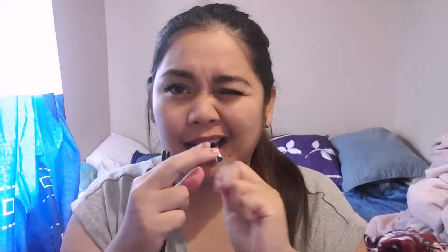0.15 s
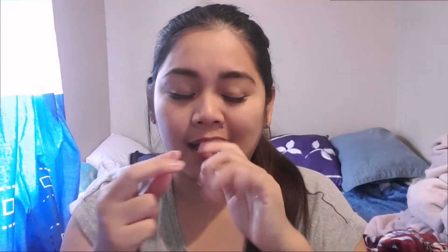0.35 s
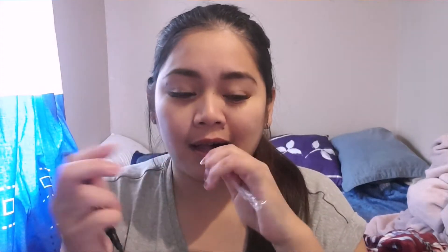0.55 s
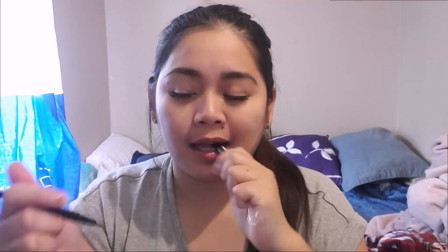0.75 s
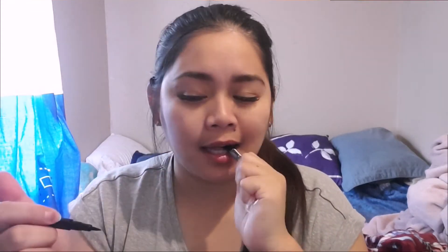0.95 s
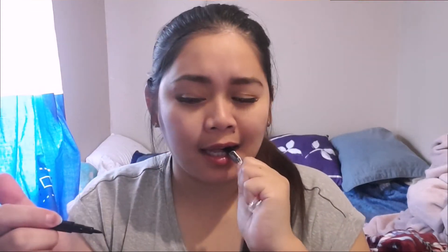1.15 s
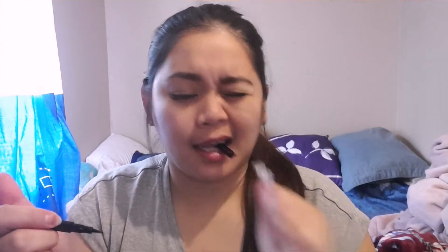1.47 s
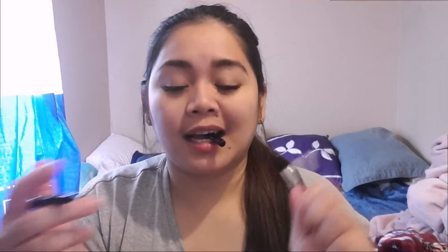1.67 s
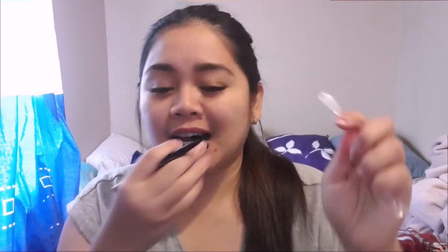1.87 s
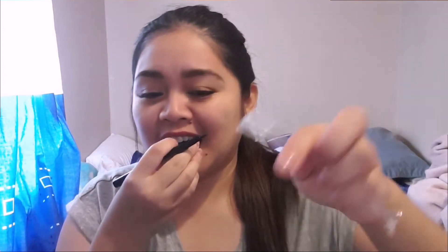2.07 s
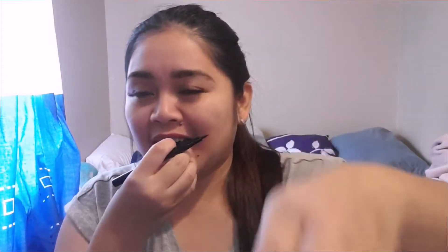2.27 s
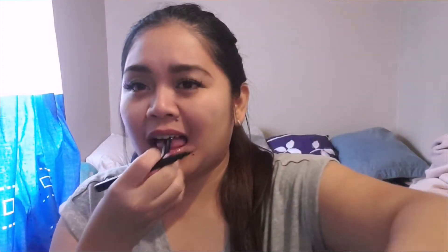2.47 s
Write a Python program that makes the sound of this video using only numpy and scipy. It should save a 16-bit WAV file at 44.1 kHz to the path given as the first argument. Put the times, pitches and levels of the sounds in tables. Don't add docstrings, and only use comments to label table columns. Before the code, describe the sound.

Thin plastic on a pen cap crackles in quick bursts, pauses, crackles again, then the cap comes off with one loud hollow pop; small ticks follow, close up in a small bedroom with a low throbbing hum.

```python
import sys
import numpy as np
from scipy import signal
from scipy.io import wavfile
from scipy.ndimage import uniform_filter1d

SR = 44100
rng = np.random.default_rng(int(sys.argv[2]) if len(sys.argv) > 2 else 0)


def digitize_waveform(pressure):
    field = np.atleast_2d(pressure).T
    bounded = np.clip(field, -1, 1)
    quanta = np.round(bounded * 32767).astype(np.int16)
    wavfile.write(sys.argv[1], SR, quanta)


def how_loud(loudness_db):
    steps = np.asarray(loudness_db, float) / 20
    return 10 ** steps


N = 114660


def rms_one(x):
    return x / np.sqrt(np.mean(x ** 2) + 1e-20)


def peak_one(x):
    return x / np.abs(x).max()


def in_time(rows):
    return np.interp(np.arange(N) / SR, *np.transpose(rows))


def at_hz(points, hz):
    points_hz, values = np.transpose(points)
    return np.interp(np.log(hz), np.log(points_hz), values)


def drift(rate_hz):
    r = np.exp(-2 * np.pi * rate_hz / SR)
    return rms_one(signal.lfilter([1], [1, -2 * r, r * r], rng.standard_normal(N + SR))[SR:])


def resonate(x, hz, width_hz):
    r = np.exp(-np.pi * width_hz / SR)
    poles = [1, -2 * r * np.cos(2 * np.pi * hz / SR), r * r]
    return signal.lfilter([(1 - r * r) / 2, 0, (r * r - 1) / 2], poles, x)


def high_pass(x, hz):
    return signal.sosfilt(signal.butter(4, hz, "high", fs=SR, output="sos"), x)


def colour(x, spectrum):
    edges_hz = 400 * 2 ** np.arange(0, 5.5, 1 / 3)
    out = 0
    for k, (low, high) in enumerate(zip(edges_hz, edges_hz[1:])):
        band = signal.sosfilt(signal.butter(1, [low, high], "band", fs=SR, output="sos"), x)
        out = out + (-1) ** k * how_loud(at_hz(spectrum, np.sqrt(low * high))) * band
    return out


# (frequency [Hz], share [0..1])
LIKENESS = [(60, 0.97), (200, 0.89), (300, 0.8), (640, 0.036), (3000, 0.029)]


def pair(hz):
    mid, side = rng.standard_normal((2, N + SR))
    alike = np.clip(at_hz(LIKENESS, hz), 0, 1)
    return np.sqrt((1 + alike) / 2) * mid + np.sqrt((1 - alike) / 2) * side * [[1], [-1]]


LEAD_S, CREAK_DB, TEAR_DB = .004, -21, 3
SNAP_RISE_S, SNAP_HOLD_S, SNAP_FALL_S = .0005, .001, .0013
SKIRT_S, SKIRT_DB = .005, -13
BRIGHT_ALIKE = .25


def burst(channels=1, stretch=1):
    t = np.arange(1800) / SR - LEAD_S
    after = np.maximum(t, 0) / stretch
    own = rng.standard_normal((channels, len(t)))
    noise = BRIGHT_ALIKE * own[0] + (1 - BRIGHT_ALIKE) * own
    uneven = how_loud(TEAR_DB * (stretch > 1) * np.repeat(rng.standard_normal(60), 30))
    creak = how_loud(CREAK_DB) * np.clip(1 + t / LEAD_S, 0, 1) * (t < SNAP_RISE_S)
    fall = np.exp(-np.maximum(after - SNAP_HOLD_S, 0) / SNAP_FALL_S)
    skirt = how_loud(SKIRT_DB) * np.exp(-after / SKIRT_S)
    tear = (1 - np.exp(-after / SNAP_RISE_S)) * (fall + skirt)
    return noise * (creak + uneven * tear)


RING_WIDTH_HZ, RING_DB, RING_OWN = 750, -2, .7
BROAD_LOW_HZ, BROAD_DB, PULL_BROAD_DB = 3000, 1.5, -5
CRACK_HZ, CRACK_WIDTH_HZ, BRIGHT_LOW_HZ, BRIGHT_DB = 13500, 5000, 9500, 7
BRIGHT_LEFT_DB = -5
# (time [s], peak [dB], ring [Hz], bright part re peak [dB])
TWISTS = [(0.1174, -25, 3980, -9.5), (0.2079, -22, 4740, -6), (0.212, -22, 4200, -10),
          (0.2788, -29.5, 7500, -1), (0.3022, -22.5, 5600, -23), (0.3068, -20.5, 3980, -10),
          (0.32, -36, 4600, 1), (0.328, -48, 4460, -6), (0.36, -50, 4730, 21.5), (0.388, -24.5, 6700, -17),
          (0.3983, -28.5, 3800, -30), (0.4243, -27.5, 5040, 0.5), (0.4376, -34, 4610, 6),
          (0.4476, -36.5, 2770, 7), (0.4641, -30.5, 5960, 2.5), (0.723, -37, 4600, -3),
          (0.7371, -30.5, 3540, -7), (0.7879, -17.5, 3050, -8.5), (0.807, -37, 3300, -2),
          (0.841, -25, 3070, -1.5), (0.843, -25.5, 3250, -6), (0.8682, -34, 3620, 6),
          (0.8788, -23, 6300, -12), (0.9146, -17, 5400, -4), (0.99, -37, 4230, -19),
          (1.0175, -33, 5540, -13), (1.0475, -44, 3970, -3)]
# (time [s], peak [dB], ring [Hz], bright part re peak [dB], length re a snap [x])
SCRAPES = [(0.232, -33, 4040, 3, 1.8), (0.253, -27.5, 6160, -17, 3), (0.2683, -28, 5570, -7, 2.8),
           (0.29, -29, 4400, -7, 3.6), (0.3104, -25.5, 4900, -20, 3), (0.375, -47, 6500, 4, 2.5),
           (0.401, -33, 6700, -24, 3.2), (0.4083, -35, 6500, -10, 1.6), (0.4586, -44, 6000, 5, 1.7),
           (0.4675, -41, 6000, 8, 1.2), (0.859, -29, 4500, 0, 2.2), (0.7825, -30, 2920, -14, 3.9),
           (0.5322, -26, 7000, 2, 2.2), (0.7992, -33.5, 3270, 2, 2.5), (0.8289, -23, 4830, -10, 2),
           (1.378, -42, 7000, 3, 3.4), (1.503, -15.5, 5900, -21, 2.1), (1.51, -21, 5000, -6, 2.6),
           (1.519, -31, 6300, -25, 1.3), (1.749, -34.5, 5560, -12, 1.5), (1.825, -50, 6000, 0, 1.6)]
# (time [s], peak [dB], ring [Hz], bright part re peak [dB])
PULLS = [(1.206, -58, 1610, 6), (1.343, -44, 4260, 4), (1.3608, -23.5, 7200, 5.5), (1.3602, -29, 6770, 5.5),
         (1.4042, -32.5, 7500, 3), (1.485, -2, 5540, -14), (1.4888, -16.5, 5700, -25),
         (1.493, -16, 5570, -30), (1.5008, -9.5, 5900, -4), (1.7376, -38.5, 6160, 4),
         (1.7456, -31, 5200, -12), (1.804, -26, 5530, 10.5), (1.851, -49, 6000, 5),
         (1.8547, -29.5, 6200, -1), (1.8852, -39.5, 6940, -1), (1.911, -46, 3680, 2),
         (1.95, -43.5, 4370, 6), (1.9884, -34.5, 4360, -2), (2.0088, -25.5, 5560, -8),
         (2.0235, -48, 5500, -2), (2.079, -62, 1590, 16), (2.239, -58, 1750, 18.5), (2.2593, -41, 4360, -4)]


def snaps():
    rings, cracks = np.zeros((2, 2, N))
    rows = [(*r, 1, 0) for r in TWISTS]
    rows += [(*r, 0) for r in SCRAPES]
    rows += [(*r, 1, PULL_BROAD_DB) for r in PULLS]
    for s, db, hz, bright_db, stretch, thin_db in rows:
        width_hz = RING_WIDTH_HZ * (hz / 4000) ** 2.6
        strike = burst(1, stretch) + RING_OWN * burst(2, stretch)
        ring = resonate(resonate(strike, hz, width_hz), hz, 2 * width_hz)
        broad = how_loud(BROAD_DB + thin_db) * peak_one(high_pass(burst(2, stretch), BROAD_LOW_HZ))
        crack = resonate(burst(2, stretch), CRACK_HZ, CRACK_WIDTH_HZ)
        bright = how_loud(BRIGHT_DB + bright_db) * peak_one(high_pass(crack, BRIGHT_LOW_HZ))
        start = int((s - LEAD_S) * SR)
        at = slice(start, start + ring.shape[1])
        rings[:, at] += how_loud(db + RING_DB) * peak_one(ring)
        cracks[:, at] += how_loud(db) * (broad + bright * how_loud([[BRIGHT_LEFT_DB], [0]]))
    return rings, cracks


KNOCK_DB = 3
# (time [s], peak [dB])
KNOCKS = [(0.1152, -46.5), (0.2126, -38), (0.2651, -40.5), (0.3057, -41), (0.388, -38), (0.3988, -45),
          (0.788, -34), (1.485, -37.5), (1.4999, -20.5), (1.522, -44), (1.536, -52)]
# (frequency [Hz], width [Hz], level [dB])
CAP = [(480, 650, -14), (1100, 330, -1), (1630, 380, -7.5), (1980, 540, 4)]


def knocks():
    out = np.zeros(N)
    for s, db in KNOCKS:
        modes = [how_loud(g) * resonate(resonate(burst()[0], hz, w), hz, 3 * w) for hz, w, g in CAP]
        x = peak_one(sum(modes))
        out[int((s - LEAD_S) * SR):][:len(x)] += how_loud(db + KNOCK_DB) * x
    return out


GRAINS_PER_S, GRAIN_S, GRAIN_SPREAD_DB, RUSTLE_DB = 500, .0025, 3, -1.5
# (time [s], level [dB])
HANDLING = [(0.0, -74), (0.2, -54), (0.35, -48), (0.41, -46), (0.51, -53), (0.55, -53), (0.76, -69.5),
            (0.89, -49), (1.06, -61.5), (1.16, -68), (1.4, -63.5), (1.55, -60.5), (1.93, -56.5),
            (2.04, -59), (2.21, -66.5), (2.6, -62.5)]
# (frequency [Hz], density [dB per Hz])
FILM = [(710, -14), (1200, 4.5), (2450, 8.5), (3830, 6.5), (4310, -9), (7170, 11), (9110, 4.5), (14200, 13),
        (16000, -79)]


def rustle():
    hits = rng.random(N) < GRAINS_PER_S / SR
    sizes = how_loud(GRAIN_SPREAD_DB * np.minimum(rng.exponential(1, N), 4)) * hits
    swell = signal.lfilter([1], [1, -np.exp(-1 / (GRAIN_S * SR))], sizes + 1e-18)
    film = rms_one(colour(swell * pair(1000)[:, SR:], FILM))
    return how_loud(in_time(HANDLING) + RUSTLE_DB) * film * how_loud([[BRIGHT_LEFT_DB / 2], [0]])


ROOM_T60_S, ROOM_GAP_S, WALL_CUT_HZ = .19, .018, 7500
TREBLE_T60_S, TREBLE_TAIL_DB = .12, 1.5


def room(x):
    t = np.arange(SR // 2) / SR
    noise = rng.standard_normal((2, len(t)))
    low = signal.sosfilt(signal.butter(2, WALL_CUT_HZ, fs=SR, output="sos"), noise)
    low_tail = low * how_loud(-60 * t / ROOM_T60_S)
    treble_tail = (noise - low) * how_loud(TREBLE_TAIL_DB - 60 * t / TREBLE_T60_S)
    tail = (low_tail + treble_tail) * np.clip(t / ROOM_GAP_S - .5, 0, 1)
    return signal.fftconvolve(x[None], tail / np.sqrt((tail ** 2).sum() / 2), axes=1)[:, :N]


HUM_LEFT_DB = -2
# (frequency [Hz], crest time [s])
MOTOR = [(100.1, .1), (147.45, .067), (152.88, .067), (183.99, .165), (189.42, .165), (194.81, .165),
         (200.24, .165), (242.2, .05), (247.6, .05)]
MOTOR_DB = [-58.5, -46.5, -51, -52, -44.5, -42, -75, -68.5, -58]
# (time [s], level [dB])
LOAD = [(0.0, -0.1), (0.3, -0.6), (0.6, 1.2), (0.9, 0), (1.2, -1), (1.5, 0), (1.65, -0.5), (1.83, -3),
        (2.0, -0.2), (2.3, -0.5), (2.6, -0.6)]


def motor():
    t = np.arange(N) / SR
    lines = 0
    for (hz, crest_s), db in zip(MOTOR, MOTOR_DB):
        lines = lines + how_loud(db - 0.5) * np.cos(2 * np.pi * hz * (t - crest_s))
    return lines * how_loud(in_time(LOAD)) * how_loud([[HUM_LEFT_DB / 2], [-HUM_LEFT_DB / 2]])


BOOM_HZ, BOOM_WANDER_RAD = 52.8, .61
# (time [s], level [dB])
BOOM = [(0.0, -66), (0.05, -42.5), (0.36, -70), (0.43, -47), (0.61, -43), (0.93, -58.5), (0.98, -46),
        (1.24, -41.5), (1.43, -52), (1.51, -41.5), (1.8, -52), (1.89, -45.5), (2.24, -53.5), (2.34, -44),
        (2.54, -58.5), (2.6, -68)]


def boom():
    phase = 2 * np.pi * BOOM_HZ * np.arange(N) / SR + BOOM_WANDER_RAD * drift(1.1)
    return how_loud(in_time(BOOM) + 3.5) * np.cos(phase)


HISS_DB, HISS_FLICKER_DB = -57.5, 2.26
WHINE_HZ, WHINE_WIDTH_HZ, WHINE_DB = 4550, 450, -67
# (frequency [Hz], width [Hz], level [dB])
RUMBLE = [(37.7, 10, -68.5), (58.6, 24, -55), (106.9, 15, -55.5), (126.6, 40, -52), (177, 41, -52),
          (241.2, 20.6, -55.5), (297, 9.6, -62.5), (312.3, 29, -63), (357, 73, -69.5), (370.6, 90, -67.5),
          (440, 7.8, -74.5), (479.7, 19, -69)]
# (frequency [Hz], density [dB per Hz])
HISS = [(400, -9), (950, -13.5), (1140, -17), (1900, -13), (2300, -16), (5200, -16), (9000, -24.5),
        (16000, -28)]


def air():
    rumble = 0
    for hz, w, db in RUMBLE:
        rumble = rumble + how_loud(db) * rms_one(resonate(resonate(pair(hz), hz, w), hz, w)[:, SR:])
    hiss = how_loud(HISS_DB + HISS_FLICKER_DB * drift(8.5)) * rms_one(colour(pair(2200), HISS)[:, SR:])
    whine = rms_one(resonate(pair(WHINE_HZ), WHINE_HZ, WHINE_WIDTH_HZ)[:, SR:])
    return rumble + hiss + how_loud(WHINE_DB + drift(9.1)) * whine


PEN_LEFT_DB, PEN_LAG_SAMPLES = -3, 4
ROOM_DB, RING_FAR_DB, HOLLOW_FAR_DB = -7, -5, -4


def scene():
    rings, cracks = snaps()
    hollow, film = knocks(), rustle()
    pen = rings + cracks + hollow + film
    left = np.roll(pen[0], PEN_LAG_SAMPLES) * how_loud(PEN_LEFT_DB / 2)
    right = pen[1] * how_loud(-PEN_LEFT_DB / 2)
    far = how_loud(RING_FAR_DB) * rings[1] + how_loud(HOLLOW_FAR_DB) * hollow + cracks[1] + film[1]
    return np.array([left, right]) + how_loud(ROOM_DB) * room(far) + motor() + boom() + air()


# (time [s], length [s], lower edge [Hz])
DROPS = [(.102, .005, 1300), (.1965, .006, 1300), (.521, .006, 5300), (.729, .005, 8000),
         (.7765, .005, 1100), (.780, .004, 4000), (1.334, .01, 11500), (1.3555, .004, 1500),
         (1.470, .002, 1300), (1.7975, .006, 1500), (1.935, .005, 8500), (2.004, .003, 5500)]


def treble_gaps(x):
    t = np.arange(N) / SR
    for s, length_s, hz in DROPS:
        gate = uniform_filter1d(1. * (np.abs(t - s) < length_s / 2), size=40)
        x = x - gate * signal.sosfiltfilt(signal.butter(4, hz, "high", fs=SR, output="sos"), x)
    return x


def band_limit(x):
    return signal.sosfilt(signal.butter(12, 17020, fs=SR, output="sos"), x)


MIC_DIP_HZ, MIC_DIP_WIDTH_HZ, MIC_DIP_DEPTH = 8880, 720, .47
PEAK, CUTOFF_HZ = 1.5, 16000


def record(dry):
    x = dry - MIC_DIP_DEPTH * resonate(dry, MIC_DIP_HZ, MIC_DIP_WIDTH_HZ)
    limited = PEAK * np.tanh(treble_gaps(x) / PEAK)
    top_cut = signal.cheby2(16, 40, CUTOFF_HZ + 100, fs=SR, output="sos")
    return band_limit(signal.sosfilt(top_cut, limited))


dry = scene()
out = record(dry)
digitize_waveform(out)
```